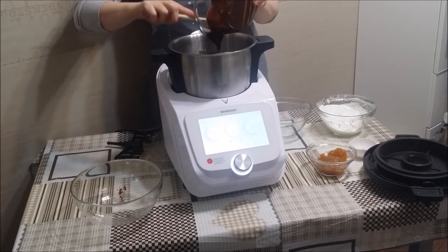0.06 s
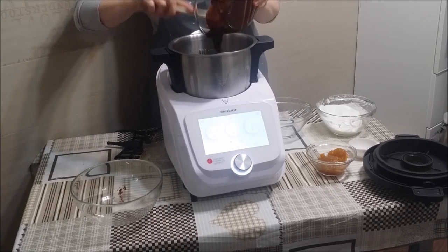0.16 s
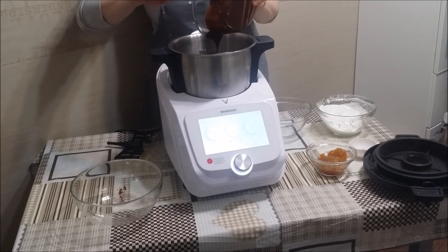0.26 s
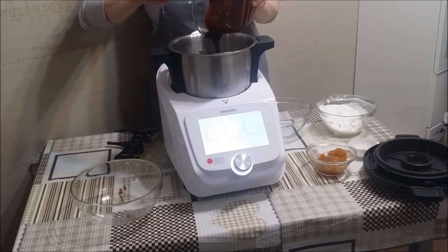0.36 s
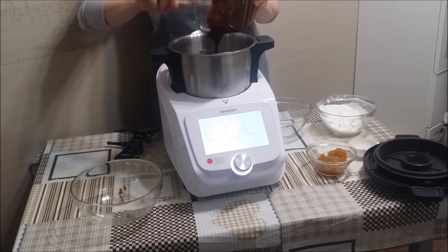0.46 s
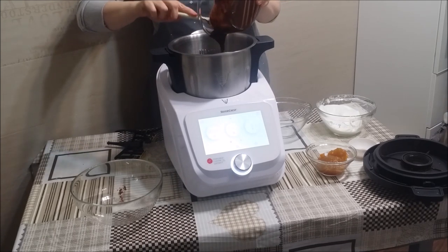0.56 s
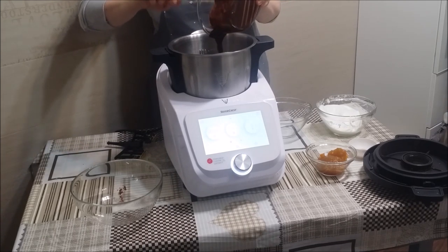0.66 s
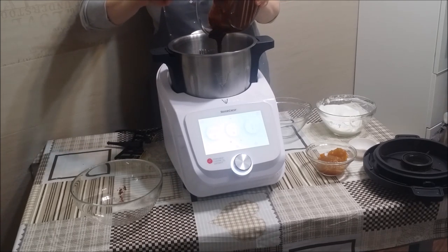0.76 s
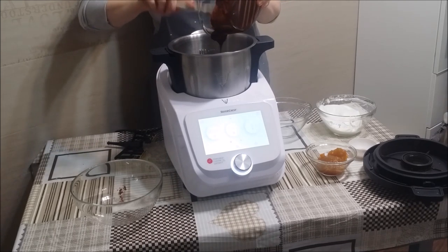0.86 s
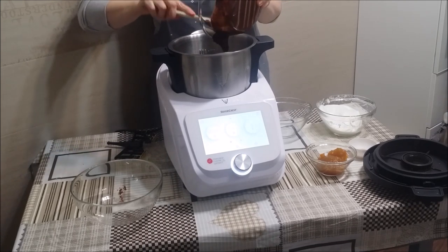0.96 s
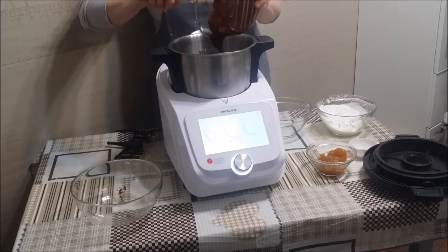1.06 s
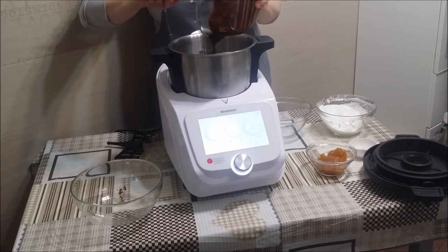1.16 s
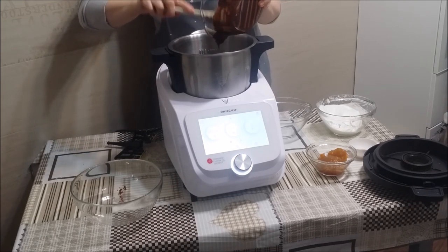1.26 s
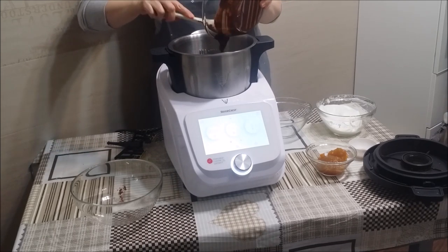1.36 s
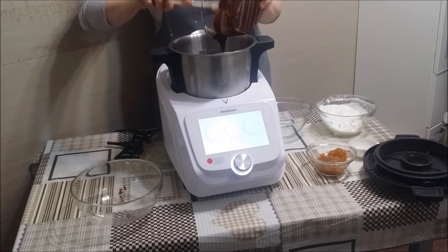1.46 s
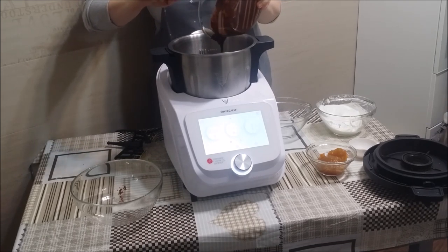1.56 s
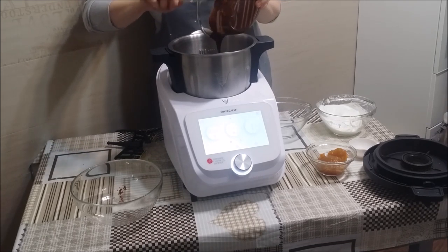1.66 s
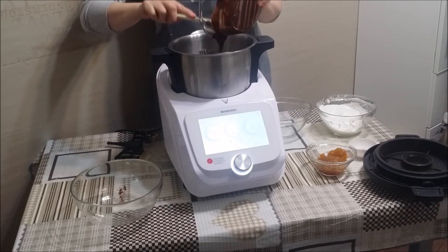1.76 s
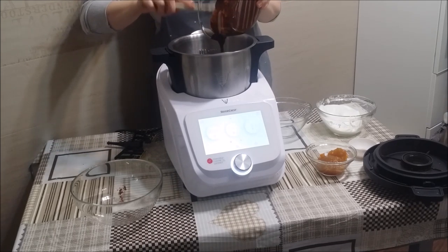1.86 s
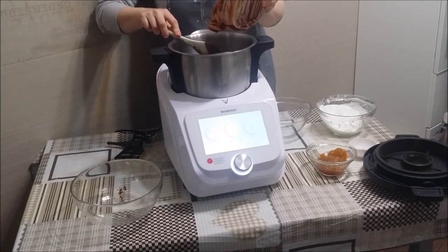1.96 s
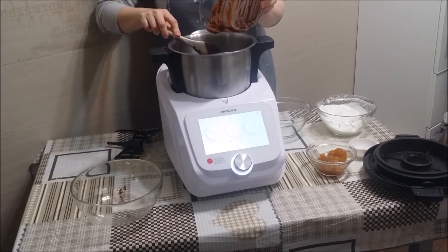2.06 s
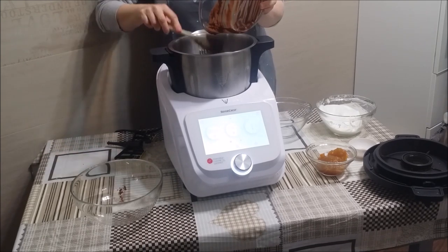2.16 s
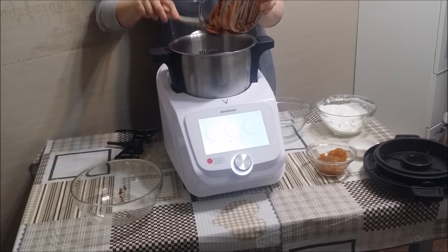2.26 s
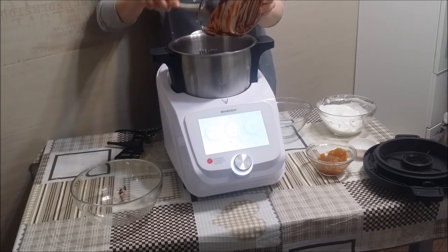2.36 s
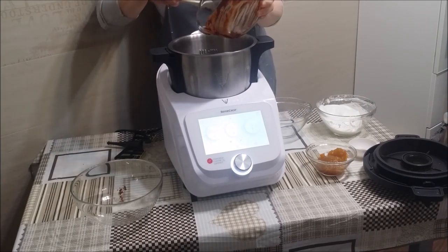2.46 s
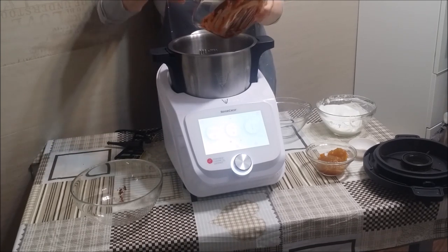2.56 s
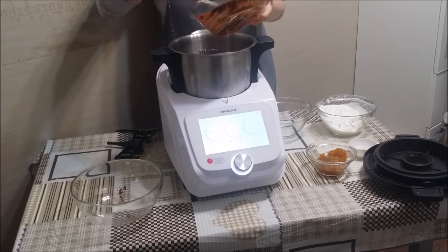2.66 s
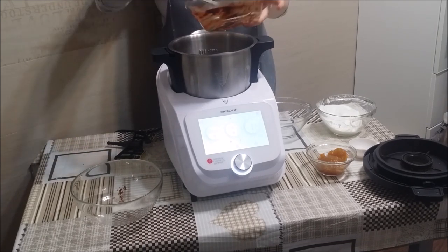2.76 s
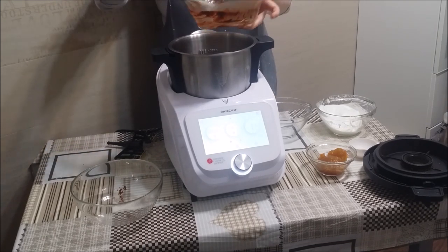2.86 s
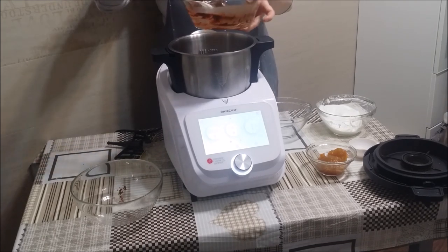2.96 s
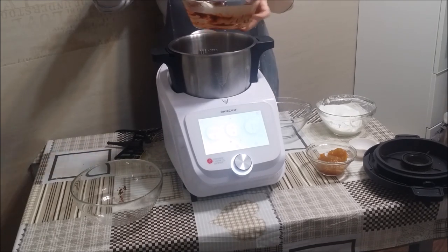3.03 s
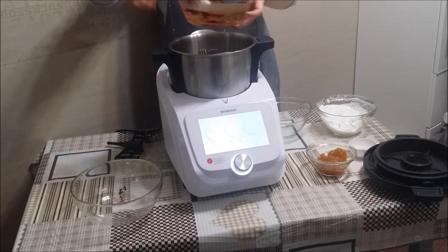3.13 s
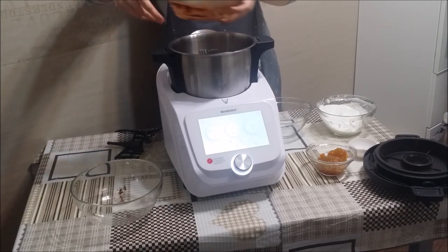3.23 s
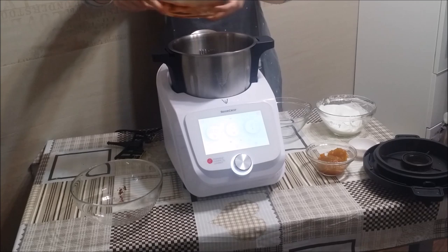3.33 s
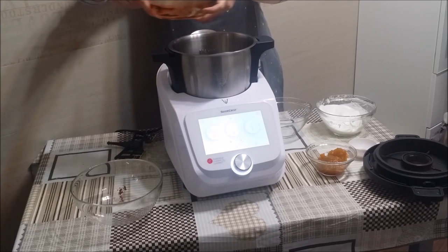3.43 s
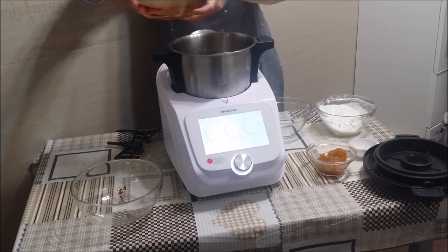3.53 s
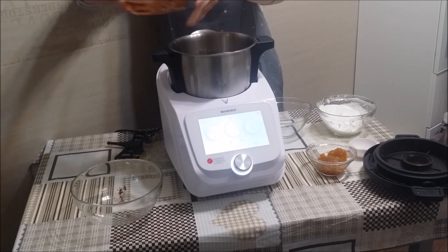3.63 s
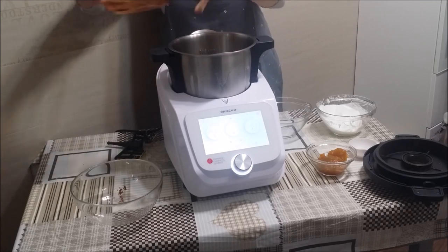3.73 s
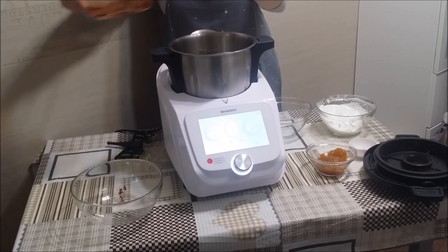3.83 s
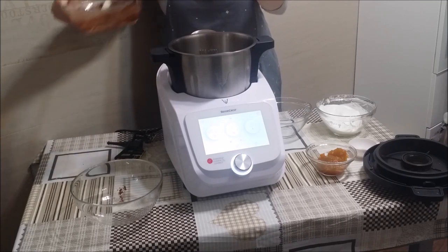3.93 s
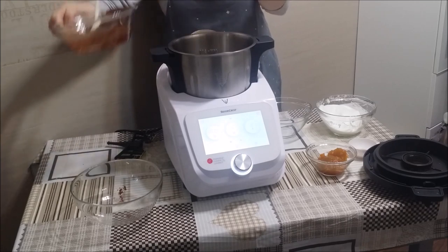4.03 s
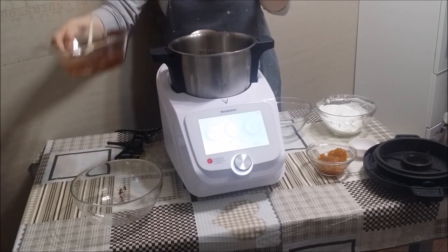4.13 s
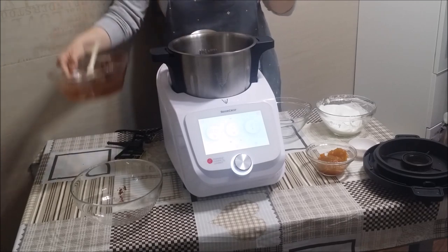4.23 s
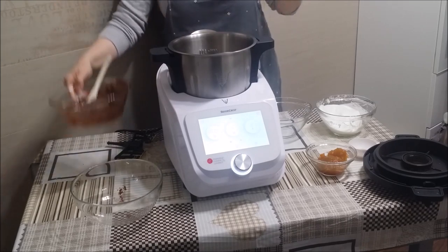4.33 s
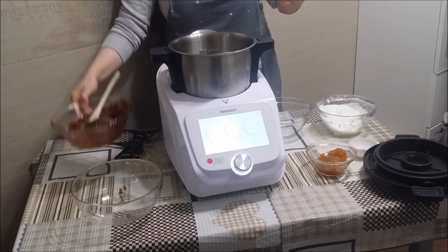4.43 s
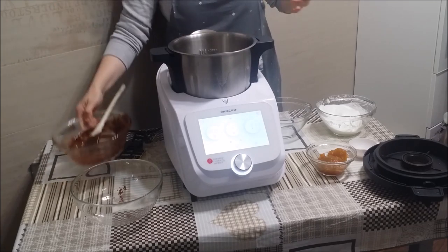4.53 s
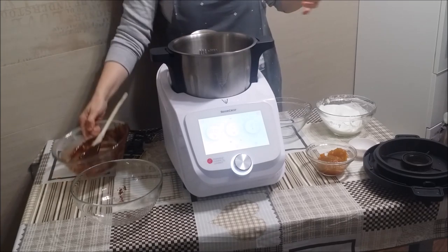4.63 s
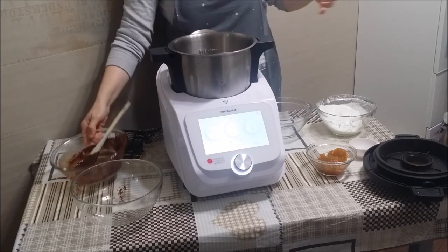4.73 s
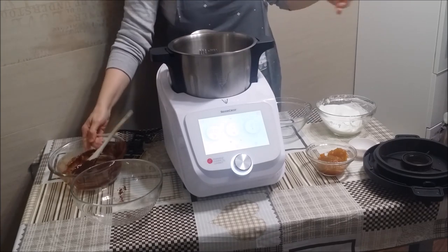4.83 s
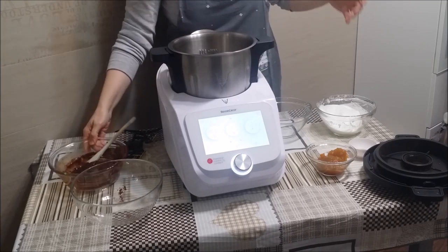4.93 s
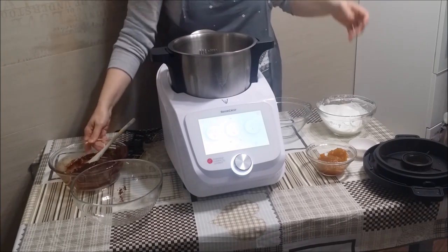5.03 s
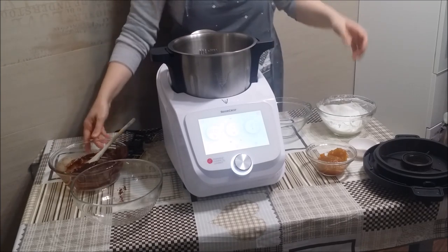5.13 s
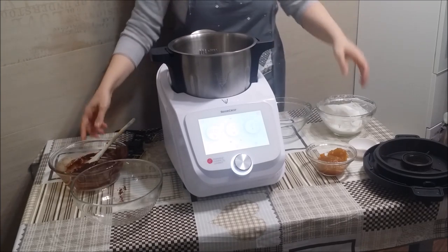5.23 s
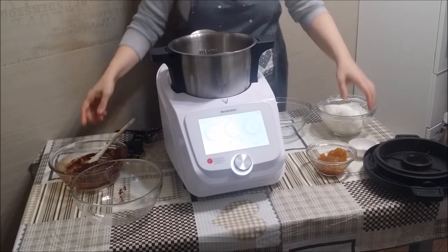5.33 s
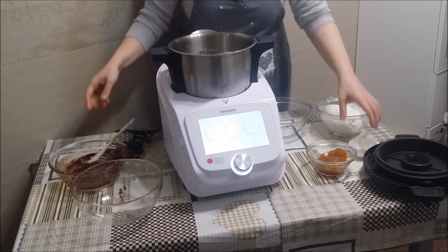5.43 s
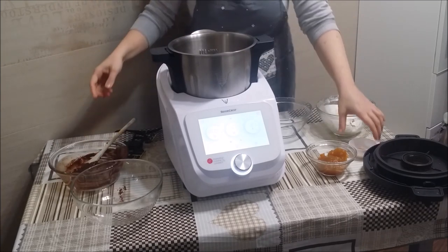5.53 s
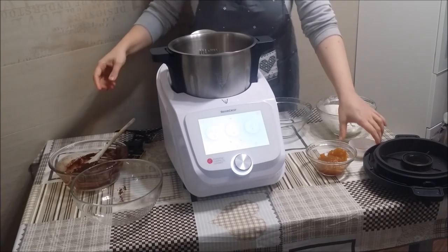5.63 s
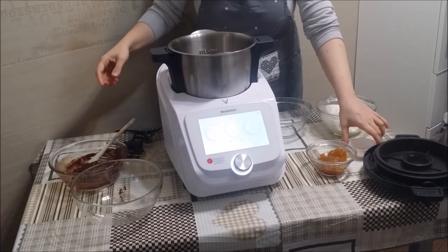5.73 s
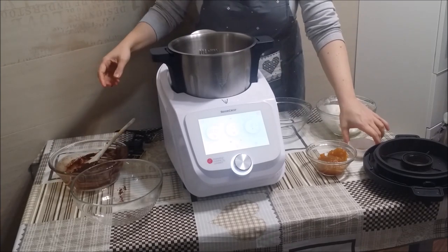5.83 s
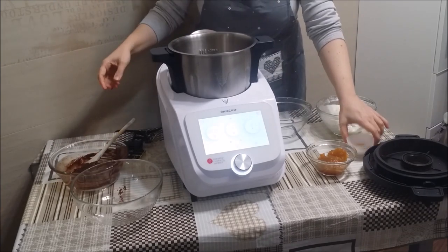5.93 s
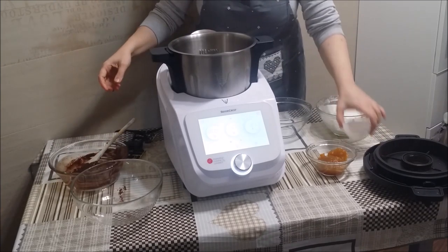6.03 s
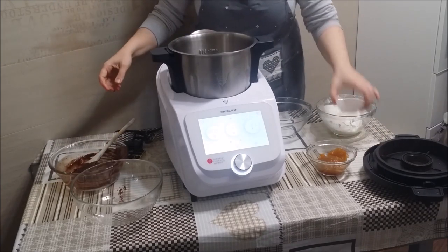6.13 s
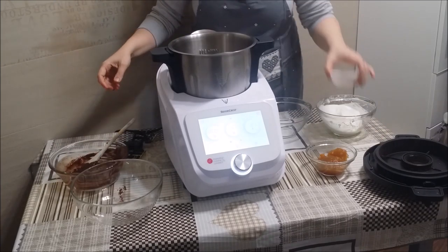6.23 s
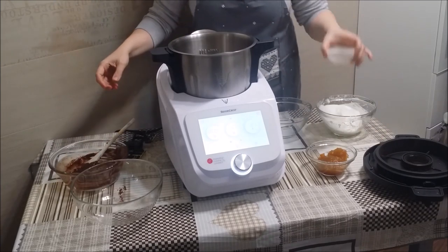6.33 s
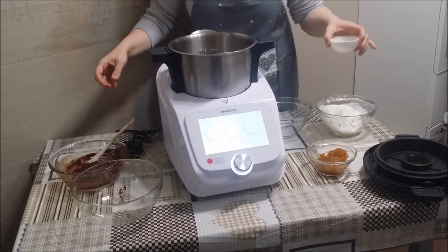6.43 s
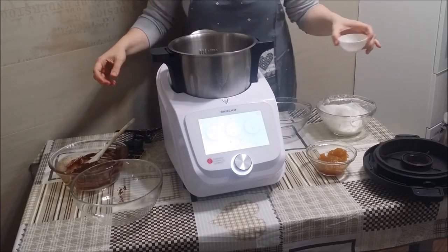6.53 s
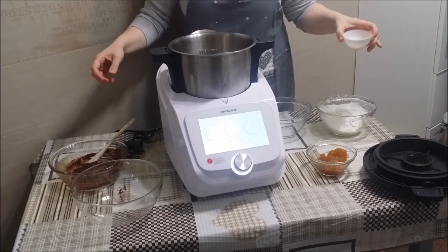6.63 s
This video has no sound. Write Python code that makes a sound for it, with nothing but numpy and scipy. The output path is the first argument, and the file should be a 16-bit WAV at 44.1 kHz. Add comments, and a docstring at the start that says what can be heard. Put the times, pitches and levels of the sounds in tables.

```python
"""Spoon, glass bowl and mixer jug.

A spoon scrapes thick paste from a glass bowl into a kitchen mixer's steel jug and knocks on the rim.
It drops back into the bowl with a clink; the bowl is set down on a cloth-covered table.
Blows ring each object's modes and a small tiled kitchen; rubbing is stick-slip noise.
An appliance hums and the idle mixer's electronics whine throughout."""
import sys
import numpy as np
from scipy import signal
from scipy.fft import rfft, irfft
from scipy.io import wavfile
from scipy.ndimage import uniform_filter1d

SR = 44100
rng = np.random.default_rng(int(sys.argv[2]) if len(sys.argv) > 2 else 0)


def store_wav(level_fs):
    """Save 16-bit WAV to argv[1]."""
    pcm = np.round(np.clip(np.atleast_2d(level_fs), -1, 1) * 32767)
    wavfile.write(sys.argv[1], SR, pcm.T.astype(np.int16))


N = 294984
TIME_S = np.arange(N) / SR
RING_S = TIME_S[:2 ** 15]
RING_TAPER = np.minimum(1, 2 - 2 * RING_S / RING_S[-1])

# appliance partials: freq_hz, level_db
HUM_PARTIALS = [(96.5, -48), (289.5, -70.5), (868, -76)]
# slow drift of the whine: time_s, pitch_hz
WHINE_DRIFT = [(0.3, 6989), (0.918, 7007), (1.244, 6970), (1.9, 7009),
               (3.4, 7021), (4.1, 6997), (5.35, 7137), (6.69, 7124)]
# background noise spectra: freq_hz, gain_db
RUMBLE_SPECTRUM = [(20, -41), (35, 9.5), (55, -10.5), (90, -2), (140, 1), (220, -4), (310, -2),
                   (500, -10.5), (900, -12), (1400, -21.5), (3000, -24), (6000, -27), (12000, -36.5)]
HISS_SPECTRUM = [(3000, -14), (5500, -19.5), (7200, 1.5), (8600, 5), (10500, -3.5), (15000, -3)]

# spoon taps in the filled bowl: start_s, level_db
PASTE_TAPS = [(.013, -48.5), (0.48, -47), (.906, -55), (1.268, -56), (1.764, -49.5)]
# nudged dishes: start_s, level_db, pitch_hz
DISH_NUDGES = [(.013, -66, 4174), (4.309, -62, 1086), (5.31, -61.5, 1107), (5.41, -62.5, 653),
               (6.33, -64, 1084)]
# blows: start_s, level_db, brightness_hz
PASTE_SMACKS = [(.683, -56, 8200), (.712, -64, 7000), (1.908, -61, 9500), (2.365, -62, 14220)]
RIM_TOUCHES = [(2.792, -49.5, 8000), (2.812, -53.5, 6140)]
GLASS_CLINKS = [(3.026, -27, 15900)]
TABLE_THUDS = [(4.984, -40.5, 1500), (4.991, -24, 940), (4.999, -28, 407), (5.024, -33.5, 255),
               (5.137, -43, 690), (5.147, -32, 166), (5.212, -52, 200)]
CLOTH_SCUFFS = [(4.984, -49.5, 16000), (5.010, -52.5, 12000), (5.129, -58, 14000)]
# spoon on the jug: start_s, level_db, brightness_hz, ring_over_crack_db
JUG_KNOCKS = [(2.003, -38, 6500, -0.5), (2.077, -26.5, 14500, -4.5), (2.197, -37, 6900, -6),
              (2.206, -34.5, 3870, -0.5)]
# rubbing strokes: middle_s, peak_db, length_s
PASTE_SCRAPES = [(.2, -68.5, 1.8), (1.08, -69.5, 0.05), (1.235, -61.5, 0.23), (1.48, -64.5, 0.19)]
GLASS_SLIDES = [(3.71, -59.5, 0.17), (4.25, -60, 0.27)]
SLEEVE_BRUSHES = [(5.795, -64, .18), (6.34, -69, 0.11)]

# ringing modes: freq_hz, gain_db, t60_s
SPOON_RING = [(736, 27, 0.044), (837, 16.5, 0.06), (925, -25, 0.12)]
JUG_RING = [(149, 6.5, 0.097), (200.3, -1.5, 0.39), (296, 0, 0.22), (394, -8, 0.12), (1425, -18, 0.42),
            (1720, -5, 0.11), (1880, -9, 0.23), (1950, -6, .22), (2050, -21, 0.18), (2340, -25, 0.22),
            (3050, -9, 0.27), (3220, -27, 0.17), (3420, -13, 0.13), (3630, -23, 0.23)]
HANDLE_RING = [(670, -11, 0.104), (1470, -27, 0.074), (4390, 5, 0.11), (4340, 6, 0.16), (4470, 5.5, 0.18)]
GLASS_RING = [(947, -8.5, .36), (2063, 1, .46), (2074, -1, .08), (3483, -7, .34), (3510, -10, .16),
              (5233, -19, .34), (5311, -19, .25), (7332, -24, .2), (8540, -15, .16), (8845, -19, .12),
              (9400, -23, .1)]
TABLE_RING = [(134, -6, 0.54), (156.7, -6, 0.45), (219.8, 3.5, 0.61), (294.7, -4.5, 0.32), (339.4, 3, 0.27),
              (490, -7, 0.12), (720, -21, 0.37), (910, -10, 0.17)]
# spectra of dense, quickly damped modes: freq_hz, gain_db
DRAG_SPECTRUM = [(500, -8), (1200, 5.5), (2400, 1), (4300, -3.5), (6500, -5), (14000, -13)]
SPOON_SPECTRUM = [(200, -29.5), (450, 4), (620, -13), (780, 6.5), (950, 6.5), (1200, -6.5), (1800, -9),
                  (3000, -18), (8000, -33)]
PASTE_SPECTRUM = [(500, 1), (1700, -3), (2400, 9), (3200, 5.5), (4300, 8.5), (6500, 4), (14000, 3)]
JUG_SPECTRUM = [(40, -33), (85, -7), (130, 1.5), (230, -1.5), (420, -7), (550, -4.5), (1300, -2.5),
                (1950, 4.5), (2700, -4), (3300, 1.5), (4400, -6), (6500, -1.5), (9000, -6), (11000, -19),
                (15000, -32)]
HANDLE_SPECTRUM = [(200, -27), (650, 1), (1000, -16), (1600, 3.5), (2500, -16), (4400, 3.5), (6000, -44),
                   (12000, -30)]
GLASS_SPECTRUM = [(150, -51), (400, 1.5), (750, -4), (1200, -11.5), (1750, 12), (2300, 4), (2900, -7.5),
                  (3500, 4), (4500, 3.5), (6000, -8), (8700, 5), (10500, -7.5), (15000, -35)]
TABLE_SPECTRUM = [(45, -46), (85, -9), (135, 7), (255, -4), (350, 5), (550, -3), (900, -6), (1250, -18),
                  (2500, -22), (10000, -40)]
CLOTH_SPECTRUM = [(300, -6), (1000, 6.5), (3000, 2.5), (6000, 0.5), (9000, 5.5), (11000, 1), (15000, -3)]

# kitchen decay: freq_hz, t60_s
ROOM_DECAY = [(125, 0.22), (400, 0.5), (2000, 0.54), (6000, 0.48), (14000, 0.35)]
# kitchen echo colour: freq_hz, gain_db
ROOM_SPECTRUM = [(64, -1), (128, -5), (256, 4), (512, 0.5), (4000, -0.5)]
# microphone port colour: freq_hz, left_minus_right_db
PORT_BALANCE = [(40, 4), (97, -3), (180, -7), (350, -1.5), (1200, -2), (3000, -1), (4500, -1), (6500, 6.5),
                (8800, -3), (12000, -0.5)]


def amp(db):
    """Decibels to gain."""
    return 10 ** (np.asarray(db) / 20)


def bins_hz(n):
    """Bin frequencies of an n-point real FFT."""
    return np.arange(n // 2 + 1) * SR / n


def at_hz(hz, points):
    """Interpolate (freq_hz, value) rows in log frequency."""
    freq_hz, value = np.transpose(points)
    return np.interp(np.log(hz + 1), np.log(freq_hz), value)


def unit(x):
    """Unit energy per channel."""
    return x / np.sqrt(np.sum(abs(x) ** 2, axis=-1, keepdims=True))


def level(x, rms_db):
    """Set rms per channel."""
    return unit(x) * np.sqrt(x.shape[-1]) * amp(rms_db)


def pan(left_minus_right_db):
    """Stereo gain pair."""
    return amp(np.array([[1], [-1]]) * left_minus_right_db / 2)


def decay(t60_s):
    """Exponential envelope."""
    return np.exp(-np.log(1000) * RING_S / t60_s)


def tint(x, spectrum):
    """Minimum-phase filter from the folded cepstrum."""
    n = x.shape[-1]
    cepstrum = irfft(np.log(amp(at_hz(bins_hz(n), spectrum))), n)
    cepstrum[1:n // 2] *= 2
    cepstrum[n // 2 + 1:] = 0
    return irfft(rfft(x) * np.exp(rfft(cepstrum)), n)


def diffuse(n, split_hz=800):
    """White noise from all sides: channels alike in the bass, unrelated in the treble."""
    coherence = 1 / (1 + (bins_hz(n) / split_hz) ** 2)
    mid, side = rfft(rng.standard_normal((2, n)))
    return irfft(mid * np.sqrt(1 + coherence) + np.array([[1], [-1]]) * side * np.sqrt(1 - coherence), n)


def kitchen(wet_db, early_db=-4, early_t60_s=0.21, build_s=0.0005, left_lag_s=0.00016, shade_hz=3500):
    """Path from one spot to the microphone: direct sound, early bounces, octave-band tail."""
    field = rfft(diffuse(len(RING_S), split_hz=480))
    octave = np.log2(np.clip(bins_hz(len(RING_S)), 64, 16384))
    swell = 1 - np.exp(-RING_S / build_s)
    early = amp(early_db) * unit(decay(early_t60_s))
    echoes = 0
    for centre in range(6, 15):
        band_hz = 2. ** centre
        band = irfft(field * np.maximum(0, 1 - abs(octave - centre)))
        tail = unit(swell * decay(at_hz(band_hz, ROOM_DECAY)))
        echoes += band * np.hypot(tail, early) * amp(at_hz(band_hz, ROOM_SPECTRUM))
    direct = np.sinc((RING_S - np.array([[left_lag_s], [0]])) * SR)
    pole = np.exp(-2 * np.pi * shade_hz / SR)  # vessel wall shades the direct treble
    return signal.lfilter([1 - pole], [1, -pole], direct) + amp(wet_db) * unit(echoes)


def body_response(modes, spectrum, wet_db, ring_db):
    """Impulse response in the room: a crack of dense modes plus the few that ring on."""
    path = kitchen(wet_db)
    crack = unit(tint(path, spectrum))
    if not modes:
        return crack
    room, ring = rfft(path), 0
    for hz, db, t60_s in modes:
        mode = np.cos(2 * np.pi * hz * RING_S) * decay(t60_s)
        ring += amp(db) * unit(room * rfft(mode))
    return unit(crack + amp(ring_db) * unit(irfft(ring)))


def strike(blows, modes, spectrum, wet_db, ring_db=0):
    """Each blow hits a new spot; softer contact pushes longer. Level: energy as rms over 50 ms."""
    out = np.zeros((2, N + len(RING_S)))
    push_s = RING_S[1:SR // 20]
    for start_s, db, brightness_hz in blows:
        push = push_s * np.exp(-2 * np.pi * brightness_hz * push_s)
        response = body_response(modes, spectrum, wet_db, ring_db)
        sound = unit(irfft(rfft(response) * rfft(push, len(RING_S)))) * RING_TAPER
        start = int(start_s * SR)
        out[:, start:start + len(RING_S)] += amp(db) * np.sqrt(SR / 20) * sound
    return out[:, :N]


def rebounds(blows, gap_s, loss_db, dulling, count=1):
    """Bounces after each blow, successively weaker and duller."""
    return [(start_s + k * gap_s, db - k * loss_db, hz * dulling ** k)
            for start_s, db, hz in blows for k in range(1, count + 1)]


def rub(strokes, response, grain_db=5, grain_samples=200, edge_drop_db=11.5):
    """Stick-slip: dense uneven pushes into a body, swelling and fading with each stroke."""
    pushes = rng.standard_normal(N)
    roughness = np.repeat(rng.standard_normal(N // grain_samples + 1), grain_samples)[:N]
    grains = pushes * amp(grain_db * roughness)
    friction = signal.fftconvolve(grains[None], response * RING_TAPER, axes=-1)[:, :N]
    pressure = sum(amp(peak_db - edge_drop_db * abs(TIME_S - middle_s) / (length_s / 2))
                   for middle_s, peak_db, length_s in strokes)
    return level(friction, 0) * pressure


def room_tone(rumble_db=-60, hiss_db=-69):
    """House rumble under a smooth hiss."""
    rumble = level(tint(diffuse(N), RUMBLE_SPECTRUM), rumble_db)
    return rumble + level(tint(diffuse(N), HISS_SPECTRUM), hiss_db)


def appliance_hum():
    """Steady motor partials."""
    return sum(amp(db) * np.sqrt(2) * np.sin(2 * np.pi * (hz * TIME_S + rng.random()))
               for hz, db in HUM_PARTIALS)


def mixer_whine(left_db=-67.5, right_drop_db=14, flutter_hz=12, cycle_s=0.638, gap_s=0.018):
    """Idle electronics: a thin, fluttering tone that breaks off once a cycle."""
    drift_hz = np.interp(TIME_S, *np.transpose(WHINE_DRIFT))
    flutter = level(uniform_filter1d(rng.standard_normal(N), size=400), 0)
    tone = np.sin(2 * np.pi * np.cumsum(drift_hz + flutter_hz * flutter) / SR)
    first_gap_s, restart_s = 0.25, 2.477
    cycles = (TIME_S - np.where(TIME_S < restart_s - gap_s, first_gap_s, restart_s)) / cycle_s
    sounding = abs(cycles - np.round(cycles)) * cycle_s > gap_s / 2
    gate = uniform_filter1d(1. * sounding, size=200)
    return level(tone, left_db) * gate * amp([[0], [-right_drop_db]])


def spoon_in_paste(firm_hz=3600, firm_db=-44, db_per_octave=8):
    """The spoon drags and taps, lighter taps duller; sticky paste smacks as it lets go."""
    drag = rub(PASTE_SCRAPES, tint(kitchen(wet_db=2.2), DRAG_SPECTRUM))
    blows = [(start_s, db, firm_hz * 2 ** ((db - firm_db) / db_per_octave))
             for start_s, db in PASTE_TAPS]
    blows += rebounds(blows, gap_s=0.007, loss_db=4, dulling=0.98)
    taps = strike(blows, SPOON_RING, SPOON_SPECTRUM, wet_db=1, ring_db=2)
    smacks = strike(PASTE_SMACKS, [], PASTE_SPECTRUM, wet_db=6)
    return drag + pan(-1.5) * taps + smacks


def dishes(brightness_hz=4000, t60_s=0.2):
    """Nudged dishes ring faintly, one mode each."""
    return sum(strike([(start_s, db, brightness_hz)], [(hz, 0, t60_s)], CLOTH_SPECTRUM,
                      wet_db=8, ring_db=-1) for start_s, db, hz in DISH_NUDGES)


def steel_jug():
    """Knocks ring the steel wall and thump the housing below; each rebounds once."""
    out = 0
    for start_s, db, brightness_hz, ring_db in JUG_KNOCKS:
        blows = [(start_s, db, brightness_hz)]
        blows += rebounds(blows, gap_s=0.0165, loss_db=8, dulling=0.39)
        out += strike(blows, JUG_RING, JUG_SPECTRUM, wet_db=9.5, ring_db=ring_db)
    return out


def spoon_handle():
    """The handle touches the rim and rings briefly."""
    return strike(RIM_TOUCHES, HANDLE_RING, HANDLE_SPECTRUM, wet_db=8.5, ring_db=1)


def glass_bowl(chatter_db=-10):
    """The spoon clinks in, chatters to rest, then slides as the bowl is carried."""
    clink = strike(GLASS_CLINKS, GLASS_RING, GLASS_SPECTRUM, wet_db=3, ring_db=13)
    bounces = rebounds(GLASS_CLINKS, gap_s=0.006, loss_db=4.5, dulling=0.52, count=2)
    chatter = amp(chatter_db) * strike(bounces, [], GLASS_SPECTRUM, wet_db=7)
    glass = body_response(GLASS_RING, GLASS_SPECTRUM, wet_db=3, ring_db=9.5)
    # light sliding contact favours the higher modes
    gritty = tint(glass, [(900, 3.5), (2100, -13), (3500, -4), (5300, 3), (8600, 4.5)])
    return pan(-1.7) * (clink + chatter + rub(GLASS_SLIDES, gritty))


def bowl_on_table():
    """The bowl thuds and rocks on the board; its foot scuffs the cloth."""
    thuds = strike(TABLE_THUDS, TABLE_RING, TABLE_SPECTRUM, wet_db=4, ring_db=-7.5)
    return thuds + strike(CLOTH_SCUFFS, [], CLOTH_SPECTRUM, wet_db=23)


def sleeve():
    """Sleeve and fingers brush things on the table."""
    fabric = tint(kitchen(wet_db=3.5), [(1000, -23), (6000, -15), (9000, -3), (14000, -23)])
    return rub(SLEEVE_BRUSHES, fabric)


def scene():
    """Stereo sum of all sources."""
    background = room_tone() + appliance_hum() + mixer_whine()
    return (background + spoon_in_paste() + dishes() + steel_jug() + spoon_handle()
            + glass_bowl() + bowl_on_table() + sleeve())


def record(dry, cutoff_hz=15550):
    """Microphone port colour, then a steep low-pass."""
    balance_db = at_hz(bins_hz(N), PORT_BALANCE)
    coloured = irfft(rfft(dry) * amp(np.array([balance_db, -balance_db]) / 2), N)
    return signal.sosfilt(signal.ellip(10, 0.2, 70, cutoff_hz, fs=SR, output="sos"), coloured)


dry = scene()
out = record(dry)
store_wav(out)
```